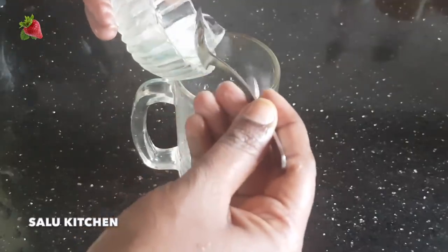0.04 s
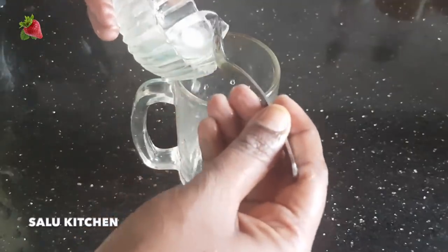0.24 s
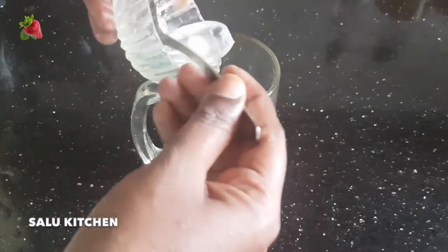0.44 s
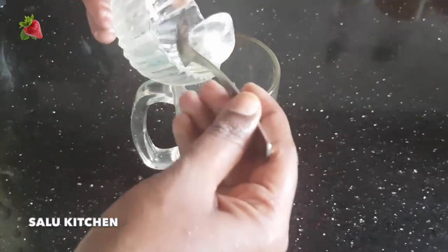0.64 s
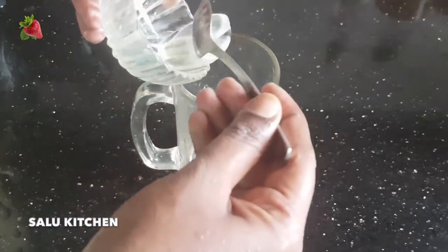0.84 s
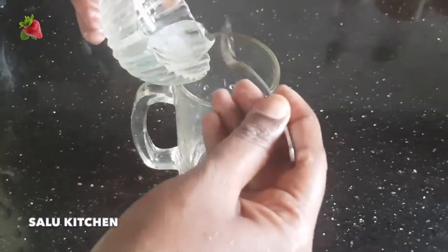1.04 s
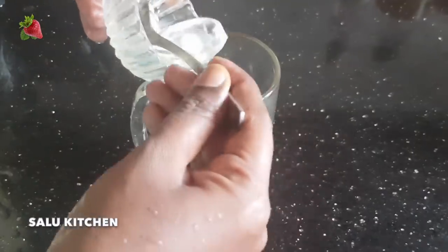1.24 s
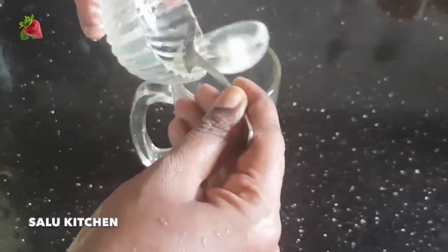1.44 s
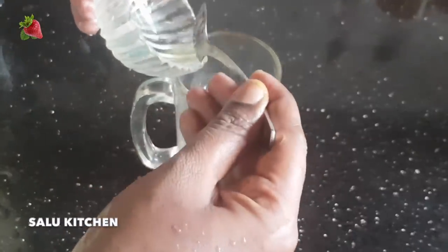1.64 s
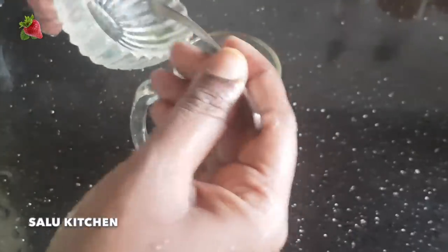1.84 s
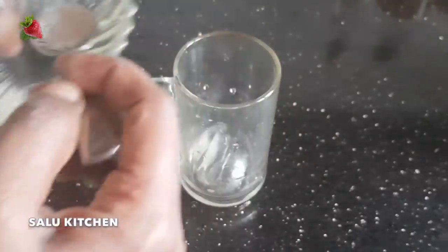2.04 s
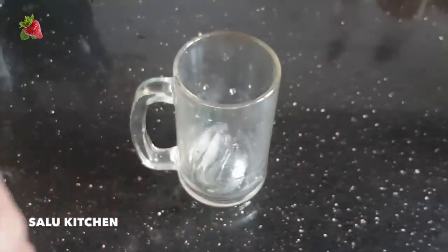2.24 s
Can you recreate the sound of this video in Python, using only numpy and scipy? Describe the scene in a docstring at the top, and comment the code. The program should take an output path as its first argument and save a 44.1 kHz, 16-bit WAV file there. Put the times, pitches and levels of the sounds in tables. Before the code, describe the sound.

Close stereo pickup in a small reflective kitchen: one ice cube rattles into a mug, spoon and ice shift quietly in a bowl, another cube clatters in, and spoon clinks finish slightly left, over faint hiss.

```python
"""Over faint hiss and rumble, a low ring dies away while a first ice cube clinks on a glass mug's rim and base.
Next, spoon and ice knock about in a glass bowl; the spoon scrapes and pushes a second cube into the mug.
Last, the spoon clinks in two bright pairs against the bowl, to the left, as both are taken away.
Glass and steel ring as damped modes, dry contacts are filtered clicks with a noisy tail, and the
background is coloured noise; every contact sounds in a small hard-walled kitchen."""
import sys
import numpy as np
from scipy import signal
from scipy.fft import rfft, irfft, next_fast_len
from scipy.io import wavfile
from scipy.ndimage import uniform_filter1d

SR = 44100
rng = np.random.default_rng(int(sys.argv[2]) if len(sys.argv) > 2 else 0)


def master_out(mix):
    """Clip the mix to full scale and print it as 16-bit PCM to the path in sys.argv[1]."""
    frames = np.transpose(np.atleast_2d(mix))
    ceiling = np.clip(frames, -1, 1)
    pcm = np.round(ceiling * 32767).astype(np.int16)
    wavfile.write(sys.argv[1], SR, pcm)


N = 101871

RING_ATTACK_S = 0.00039
MUG_ROOM_DB, SPOON_ROOM_DB, KNOCK_ROOM_DB = -2, -3, -0.5  # diffuse tail of each source


def amp(db):
    """Decibels to gain."""
    return 10 ** (np.asarray(db) / 20)


def decay(t_s, t60_s):
    """Exponential decay by 60 dB in t60_s."""
    return np.exp(-np.log(1000) * t_s / t60_s)


def attack(t_s):
    """Exponential rise of a ring."""
    return 1 - np.exp(-t_s / RING_ATTACK_S)


def along(points, hz):
    """(frequency [Hz], value) points read on a log-frequency axis."""
    f, v = np.transpose(points)
    return np.interp(np.log(hz + 1), np.log(f + 1), v)


TILT_CENTRE_HZ = 3800


def tilted(db_per_octave, hz):
    """Gain [dB] of a harder (brighter) or softer (duller) contact; flat below 700 Hz."""
    return db_per_octave * np.log2(np.maximum(hz, 700) / TILT_CENTRE_HZ)


def causal(gain_db, size=4096):
    """Minimum-phase impulse response of a gain curve, by folding its cepstrum."""
    hz = np.fft.rfftfreq(size, 1 / SR)
    cepstrum = irfft(np.log(amp(gain_db(hz))))
    cepstrum[1:size // 2] *= 2
    cepstrum[size // 2 + 1:] = 0
    return irfft(np.exp(rfft(cepstrum)))


ALIKE = 0.32  # energy share common to both ears


def ears(three):
    """Mix one shared and two separate signals into a stereo pair, each ear of energy 1."""
    pair = np.sqrt(ALIKE) * three[0] + np.sqrt(1 - ALIKE) * three[1:]
    return pair / np.linalg.norm(pair, axis=1, keepdims=True)


def noise(spectrum):
    """Stereo noise of rms 1, white noise coloured by a spectrum."""
    white = rng.standard_normal((3, N))
    gain = amp(along(spectrum, np.fft.rfftfreq(N, 1 / SR)))
    return np.sqrt(N) * ears(irfft(rfft(white) * gain, N))


def neutral(response, size=4096):
    """Even out the broad colour of a room response, keeping its echoes."""
    hz = np.fft.rfftfreq(response.shape[1], 1 / SR)
    power = np.mean(np.abs(rfft(response)) ** 2, axis=0)
    smooth = np.abs(uniform_filter1d(power, size=45)) / power.mean()
    flatten = causal(lambda f: -10 * np.log10(np.interp(f, hz, smooth)), size=size)
    return signal.fftconvolve(response, flatten[None], axes=1)


# reverberation time of the kitchen: (frequency [Hz], t60 [s])
ROOM_T60 = [(100, 1), (500, 0.55), (2000, 0.43), (5000, 0.4), (9000, 0.38), (15000, 0.32)]
ROOM_BUILD_S = 0.0087
WALLS_DB, WALLS_FROM_S, WALLS_TO_S = 1.5, .001, .011  # first echoes off the counter and tiles


def kitchen(tail_db, count=14):
    """Stereo response from one spot: direct sound, early echoes and a diffuse tail."""
    n = 24000
    hz, t, bands = signal.stft(rng.standard_normal((3, n)), SR, nperseg=256)
    t60_s = along(ROOM_T60, hz)[:, None]
    tail = signal.istft(bands * decay(t, t60_s), SR, nperseg=256)[1][:, :n]
    tail *= 1 - np.exp(-np.arange(n) / SR / ROOM_BUILD_S)
    walls = np.zeros_like(tail)
    for row in walls:
        echo_s = rng.uniform(WALLS_FROM_S, WALLS_TO_S, count)
        row[(echo_s * SR).astype(int)] = rng.standard_normal(count)
    response = amp(tail_db) * ears(tail) + amp(WALLS_DB) * ears(walls)
    response[:, 0] += 1  # direct sound
    return neutral(response)


LEAD_S_PER_DB = .00002


def add(out, s, sound, pan_db, room_db):
    """Play a sound in the kitchen at time s; the nearer ear hears it louder and earlier."""
    heard = signal.fftconvolve(np.atleast_2d(sound), kitchen(room_db), axes=1)
    for ear, x, side_db in zip(out, heard, (pan_db / 2, -pan_db / 2)):
        start = max(round((s - LEAD_S_PER_DB * side_db) * SR), 0)
        ear[start:start + len(x)] += amp(side_db) * x[:N - start]


MODE_SPREAD = 0.17  # random phase offset of a mode at each ear, std [cycles]


def ring(hz, t60_s, levels_db, tilt_db):
    """Damped modes in stereo, each radiating with its own phase to either side."""
    t = np.arange(14000) / SR
    hz, t60_s, levels_db = np.array([hz, t60_s, levels_db])
    modes = np.exp(np.outer(2j * np.pi * hz - np.log(1000) / t60_s, t))
    phase_cycles = rng.random(len(hz)) + MODE_SPREAD * rng.standard_normal((2, len(hz)))
    gains = amp(levels_db + tilted(tilt_db, hz)) * np.exp(2j * np.pi * phase_cycles)
    return (gains @ modes).imag * attack(t)


CRUNCH_T60_S, CRUNCH_GAIN = 0.027, 0.16  # noise gain relative to the first push


def contact(spectrum, tilt_db):
    """One sharp push followed by a few milliseconds of crunch, coloured by the struck body."""
    t = np.arange(SR // 20) / SR
    force = CRUNCH_GAIN * rng.standard_normal(len(t)) * decay(t, CRUNCH_T60_S)
    force[0] = 1
    body = causal(lambda hz: along(spectrum, hz) + tilted(tilt_db, hz))
    return 2 * signal.fftconvolve(force, body)


# rumble spectrum: (frequency [Hz], relative level [dB])
RUMBLE = [(25, -19.5), (50, -24.5), (70, -2.5), (100, 1.5), (140, -9.5), (300, -13.5), (500, -4.5),
          (1200, -38.5), (4000, -70.5)]
# rumble level: (time [s], level [dB])
RUMBLE_LEVEL = [(0, -63), (.3, -62.5), (.6, -74.5), (.8, -83), (1.15, -83), (1.4, -67), (1.9, -63),
                (2.299, -64)]
# hiss spectrum: (frequency [Hz], relative level [dB])
HISS = [(100, -13), (350, -3), (1000, -5.5), (2500, -4), (5000, -20), (9000, -15.5), (16000, -16.5)]
HISS_DB = -68.5


def room_tone():
    """Steady coloured hiss, and a low rumble that sinks between the two cubes."""
    rumble_db = np.interp(np.arange(N) / SR, *np.transpose(RUMBLE_LEVEL))
    return amp(rumble_db) * noise(RUMBLE) + amp(HISS_DB) * noise(HISS)


# low partials: (frequency [Hz], level [dB], t60 [s])
LOW_RING = [(265, -39, 0.17), (309, -35, 0.14), (360, -32, .22)]
# dull wash spectrum: (frequency [Hz], relative level [dB])
LOW_WASH = [(60, -22.5), (150, -16.5), (280, -1.5), (450, -11.5), (1000, -13.5), (2500, -15.5),
            (5000, -28.5), (15000, -49.5)]
LOW_WASH_DB, LOW_WASH_T60_S = -34.5, 0.56


def low_ring():
    """Decaying low sines over a decaying dull noise wash, from the start."""
    t = np.arange(N) / SR
    tone = np.zeros(N)
    for hz, db, t60_s in LOW_RING:
        tone += amp(db) * decay(t, t60_s) * np.sin(2 * np.pi * (hz * t + rng.random()))
    wash = amp(LOW_WASH_DB) * decay(t, LOW_WASH_T60_S) * noise(LOW_WASH)
    return (tone + wash) * attack(t)


# ice ringing the mug: (time [s], level [dB], tilt [dB/octave], place struck)
MUG_HITS = [(.012, -40.5, 10, "base"), (0.0673, -13.5, 2, "rim"), (0.129, -35.5, 8, "base"),
            (0.191, -28, -4.5, "rim"), (0.217, -31, -1, "base"), (.301, -43, -10, "rim"),
            (.812, -51.5, -11, "wall"), (1.5102, -20, -0.5, "wall"), (1.673, -16.5, -2.5, "base"),
            (1.737, -21, -4, "bounce")]
# mug modes, one entry each: frequency [Hz]
MUG_HZ = [1895, 2310, 2628, 2785, 2950, 3096, 3896, 5490, 6611, 7195, 8615, 9810, 10020, 10604, 11260,
          12600, 13898, 14620, 14960, 15560]
# ring time of each mug mode: t60 [s]
MUG_T60_S = [.2, 0.15, 0.24, 0.069, 0.11, 0.059, .2, 0.25, 0.11, 0.17, 0.13, 0.068, 0.17, 0.11, 0.11, 0.095,
             .16, .12, .12, 0.15]
# place struck: relative level of each mug mode [dB]
MUG_DB = {"rim": [-32, -18, -0.5, -31, -40.5, -36, -10.5, 1, -5, -18.5, -7, -39, -26.5, -12, -26, -47.5,
          -25, -20, -16, -32], "wall": [-42, 3, -10.5, -39, -46, -47, -15.5, -7.5, -10, -3, -21.5, -0.5,
          -13, -10, -9, -4, -22, -22.5, -26, -9], "base": [-18.5, -11, -9, -10.5, -11, -2.5, -11, -6.5,
          -2.5, 1, -17.5, -25, -11, -8, -32.5, -39, -11.5, -10.5, -26.5, -36], "bounce": [-13, -3.5, -5.5,
          0, -22, -27, -25, -18, -24, 0, -16, -35, -9.5, -17, -40, -40, -19, -24, -38, -39.5]}


def mug():
    """Ice excites the mug's damped modes, weighted by the place struck."""
    out = np.zeros((2, N))
    for s, db, tilt_db, place in MUG_HITS:
        add(out, s, amp(db) * ring(MUG_HZ, MUG_T60_S, MUG_DB[place], tilt_db), 0, MUG_ROOM_DB)
    return out


# ice knocking on glass: (time [s], level [dB], tilt [dB/octave], left over right [dB], glass struck)
KNOCKS = [(.021, -23.5, -10.5, 5, "mug"), (0.0688, -4.5, 1.5, 13, "mug"), (.123, 3, -1.5, 3.5, "mug"),
          (0.1334, -3.5, 1, 0.5, "mug"), (.207, -17.5, -2, -14, "mug"), (0.219, -9, 3, 7, "mug"),
          (.428, -27, -0.5, 5, "bowl"), (.477, -20.5, 0.5, 2, "bowl"), (.511, -21, -1, 1, "bowl"),
          (0.626, -35.5, -0.5, 5, "bowl"), (.812, -26.5, -4.5, 2.5, "bowl"),
          (0.823, -30.5, -5.5, 5, "bowl"), (.896, -30, -5, -3.5, "bowl"), (.915, -30.5, -4, 5, "bowl"),
          (.948, -34.5, -3, 1, "bowl"), (1.167, -25, -1, 2, "bowl"), (1.189, -34.5, -2, -5, "bowl"),
          (1.251, -28, 0, 10.5, "bowl"), (1.259, -22, 8.5, -3.5, "bowl"), (1.288, -17.5, 0.5, 4, "bowl"),
          (1.299, -28, 8, 0.5, "bowl"), (1.4352, -19.5, 5.5, 2, "bowl"), (1.5103, -9.5, -1, 10.5, "bowl"),
          (1.523, -7.5, -1, -0.5, "bowl"), (1.6602, -7.5, -3, 7, "mug"), (1.669, -14.5, 0.5, -0.5, "mug"),
          (1.674, -4, 1, 0.5, "mug"), (1.696, -1.5, 1.5, 1.5, "mug"), (1.737, -4, -1, 1.5, "mug"),
          (2.0168, -18, 0, 2.5, "bowl")]
# ice knock on the mug: (frequency [Hz], relative level [dB])
MUG_KNOCK = [(60, -27), (200, -27), (400, -14), (550, -10.5), (800, -1), (1600, 1.5), (2200, -1),
             (3200, 5.5), (5500, -0.5), (8500, -12.5), (12000, -16.5), (15500, -15.5)]
# ice knock on the bowl: (frequency [Hz], relative level [dB])
BOWL_KNOCK = [(150, -32), (450, -13.5), (900, 1.5), (1400, 2), (2200, 5), (2800, -4), (4500, -2.5),
              (8500, -12.5), (15500, -17)]


def knocks():
    """Ice knocks dryly on the glass; each glass colours the contact force."""
    out = np.zeros((2, N))
    for s, db, tilt_db, pan_db, glass in KNOCKS:
        spectrum = MUG_KNOCK if glass == "mug" else BOWL_KNOCK
        add(out, s, amp(db) * contact(spectrum, tilt_db), pan_db, KNOCK_ROOM_DB)
    return out


# cube notes, hollow on a shift, bright on a strike: (time [s], level [dB], frequency [Hz])
CUBE_NOTES = [(.134, -29, 3700), (.219, -21.5, 3260), (.432, -38.5, 897), (.812, -37.5, 884),
              (.915, -38, 940), (1.595, -33, 614), (1.608, -31.5, 740), (1.697, -15.5, 3033)]
CUBE_T60_S = 0.034


def cube_notes():
    """A cube gives one short damped mode as it shifts or strikes."""
    out = np.zeros((2, N))
    for s, db, hz in CUBE_NOTES:
        add(out, s, ring([hz], [CUBE_T60_S], [db], 0), 0, KNOCK_ROOM_DB)
    return out


# modes of spoon against bowl, one entry each: frequency [Hz]
SPOON_HZ = [2197, 4280, 4625, 5320, 6153, 6490, 7230, 7480, 9270, 9798, 10610, 11600, 12080, 12280, 12600,
            13244, 14560, 15010, 15590]
# ring time of each spoon mode before the sustain factor: t60 [s]
SPOON_T60_S = [.09, 0.077, 0.079, .038, 0.052, 0.037, 0.038, 0.082, 0.043, 0.12, .05, .05, 0.064, 0.065,
               0.14, 0.078, .06, .06, .08]
# touching part: relative level of each spoon mode [dB]
SPOON_DB = {"scoop": [2.5, -1.5, 0, -27, -33, -13, -0.5, -30, -47, -27, -17.5, -36, -45, -40, -48, -48,
            -43.5, -23, -45.5], "edge": [-20.5, -1.5, -21, -11.5, -3, -25, -29, -15, -17, -1, -12.5, -6, -6,
            -5, -5, -6, -34, -24, -19.5], "tip": [-9.5, 0.5, -11.5, -11, -17, -1.5, -0.5, 1, -13, -22, -6,
            -11, 0, -7, -12, -17.5, -6.5, -11.5, -9]}
# touching part: ring time factor [1]; pressed on the ice the spoon is damped, lifted it rings on
SPOON_SUSTAIN = {"scoop": 0.63, "edge": 0.63, "tip": 1.14}


def spoon_ring(part, tilt_db):
    """Spoon modes, as strong and as long as the touching part lets them be."""
    t60_s = SPOON_SUSTAIN[part] * np.array(SPOON_T60_S)
    return ring(SPOON_HZ, t60_s, SPOON_DB[part], tilt_db)


# spoon contacts: (time [s], ring level [dB], tick level [dB], tilt [dB/octave],
#                  left over right [dB], touching part)
SPOON_HITS = [(.477, -43.5, -18, 5, 1.5, "tip"), (.663, -51, -34, -4, 0.5, "scoop"),
              (.68, -55, -34.5, -3.5, 1.5, "scoop"), (.896, -49.5, -55, -13, 2, "scoop"),
              (.948, -49.5, -37.5, -10, 1.5, "scoop"), (1.129, -69, -63, -15.5, -0.5, "scoop"),
              (1.4206, -36, -26.5, -6, -0.5, "scoop"), (1.4353, -16.5, -14, 1, 0, "scoop"),
              (2.0172, -16.5, -4, 0.5, 9, "edge"), (2.043, -23.5, -9, -0.5, 6, "edge"),
              (2.1617, -26, -4, 2.5, 8, "tip"), (2.194, -29.5, -9.5, 0, 2.5, "tip")]
# steel tick: (frequency [Hz], relative level [dB])
TICK = [(60, -29), (200, -22.5), (450, -15), (1200, -12), (1800, -16.5), (3200, -0.5), (5500, -6),
        (8000, -3), (12000, -7), (15500, -10.5)]


def spoon():
    """The spoon ticks (contact force) and rings (modes) on the bowl."""
    out = np.zeros((2, N))
    for s, ring_db, tick_db, tilt_db, pan_db, part in SPOON_HITS:
        clink = amp(ring_db) * spoon_ring(part, tilt_db)
        tick = amp(tick_db) * contact(TICK, tilt_db)
        clink[:, :len(tick)] += tick
        add(out, s, clink, pan_db, SPOON_ROOM_DB)
    return out


# spoon scraping along the bowl: (start [s], end [s], first slip level [dB], last slip level [dB])
SCRAPE = (1.345, 1.54, -49.5, -35)
SCRAPE_TILT_DB_PER_OCTAVE = -3
SCRAPE_GRIT_DB = 4.5  # dry grit of each slip, relative to its ring


def scrape(count=16):
    """Tiny slips, ever stronger, excite grit and spoon modes as the second cube is pushed."""
    start_s, end_s, first_db, last_db = SCRAPE
    progress = (np.arange(count) + rng.random(count)) / count
    slip_samples = (progress * (end_s - start_s) * SR).astype(int)
    slips = np.bincount(slip_samples, amp(first_db + (last_db - first_db) * progress))
    steel = spoon_ring("scoop", SCRAPE_TILT_DB_PER_OCTAVE)
    grit = amp(SCRAPE_GRIT_DB) * contact(BOWL_KNOCK, SCRAPE_TILT_DB_PER_OCTAVE)
    steel[:, :len(grit)] += grit
    out = np.zeros((2, N))
    add(out, start_s, signal.fftconvolve(slips[None], steel, axes=1), 0, SPOON_ROOM_DB)
    return out


def scene():
    """Sum of everything heard at the counter."""
    return room_tone() + low_ring() + mug() + knocks() + cube_notes() + spoon() + scrape()


TOP_HZ = 15900


def record(dry):
    """Clip at full scale, then remove everything from the band limit up."""
    m = next_fast_len(N + SR // 2)
    passband = np.fft.rfftfreq(m, 1 / SR) < TOP_HZ
    return irfft(rfft(np.clip(dry, -1, 1), m) * passband, m)[:, :N]


dry = scene()
out = record(dry)
master_out(out)
```